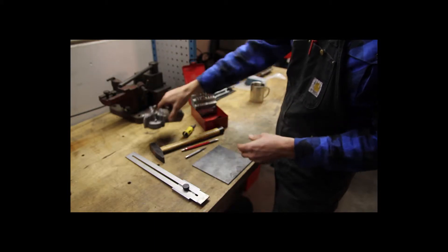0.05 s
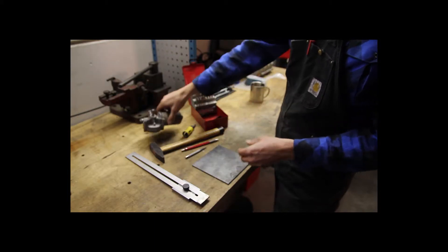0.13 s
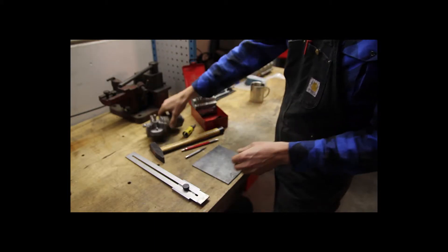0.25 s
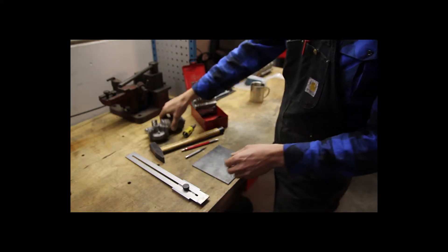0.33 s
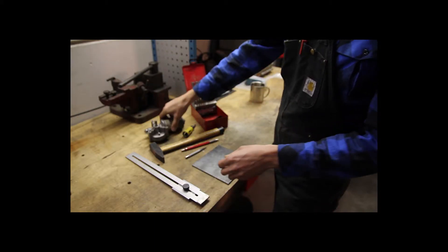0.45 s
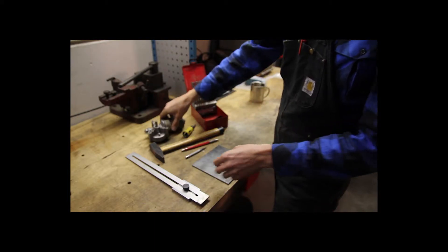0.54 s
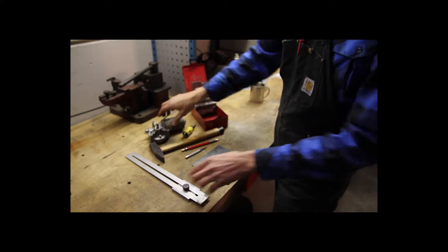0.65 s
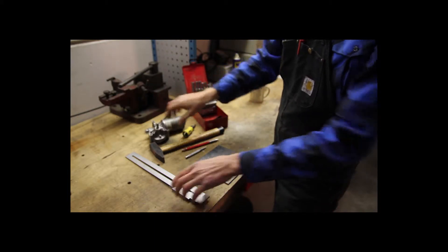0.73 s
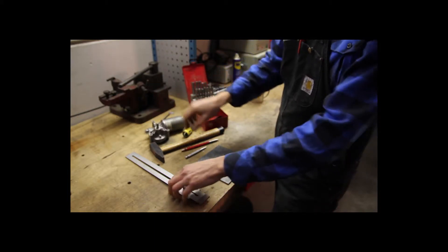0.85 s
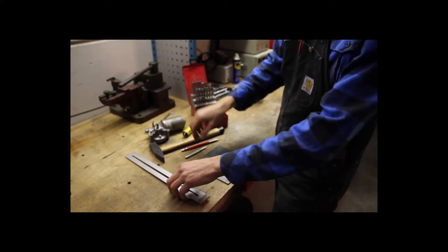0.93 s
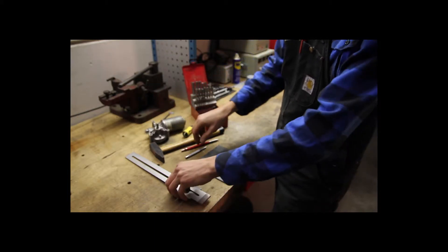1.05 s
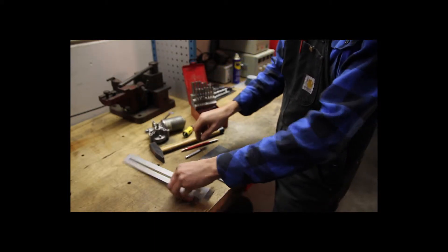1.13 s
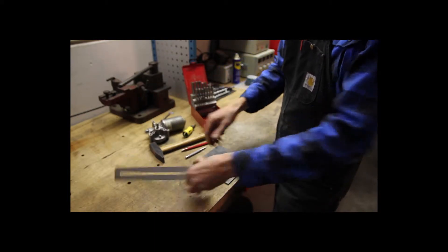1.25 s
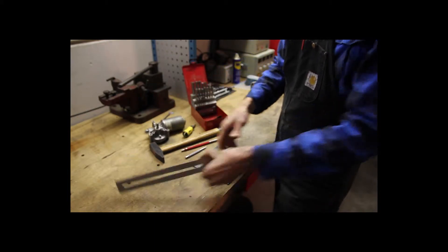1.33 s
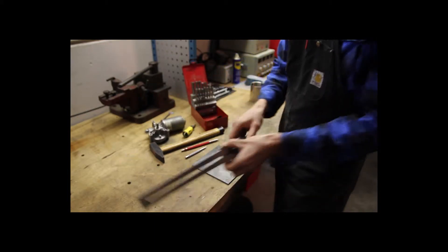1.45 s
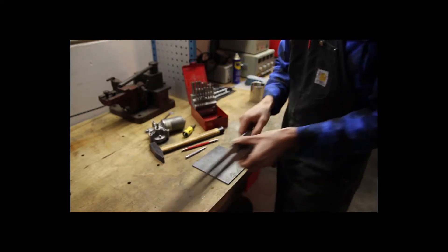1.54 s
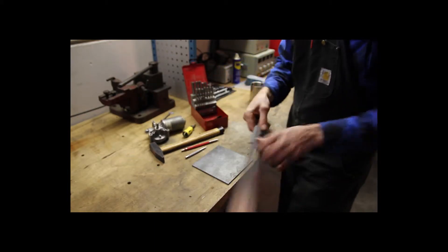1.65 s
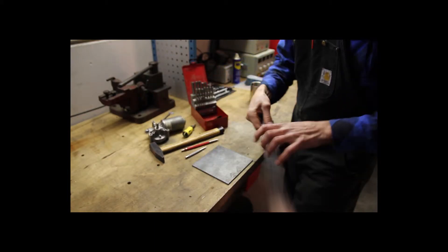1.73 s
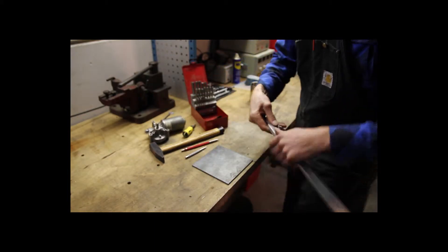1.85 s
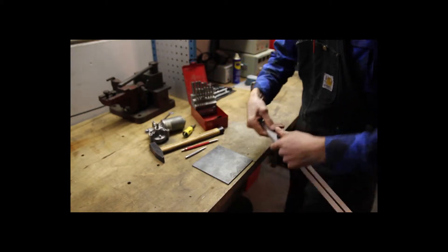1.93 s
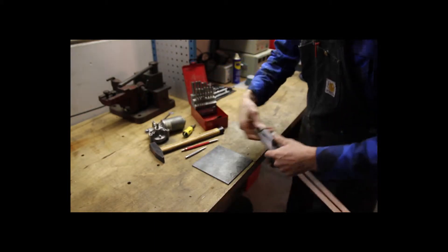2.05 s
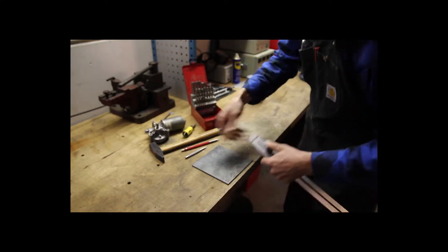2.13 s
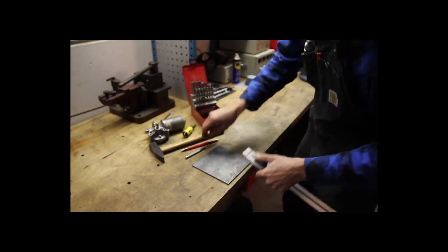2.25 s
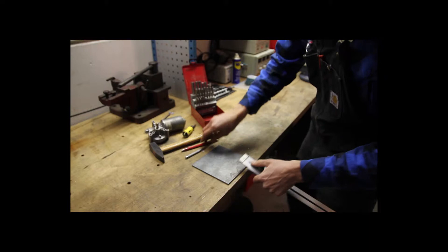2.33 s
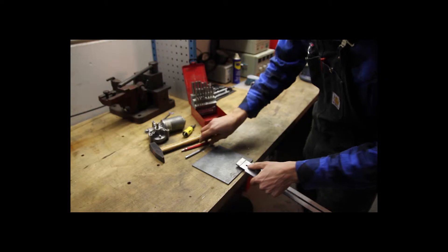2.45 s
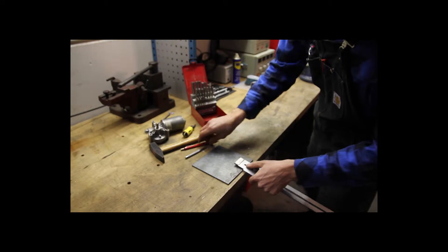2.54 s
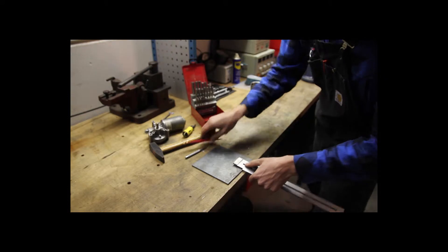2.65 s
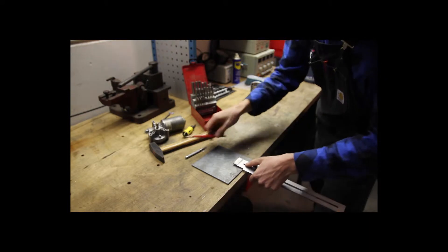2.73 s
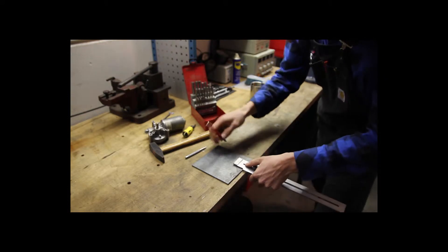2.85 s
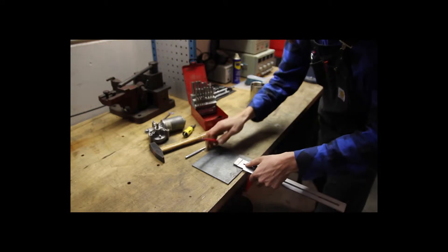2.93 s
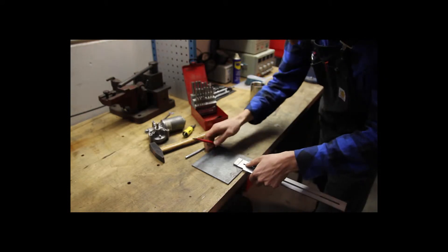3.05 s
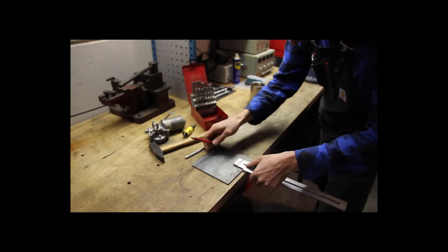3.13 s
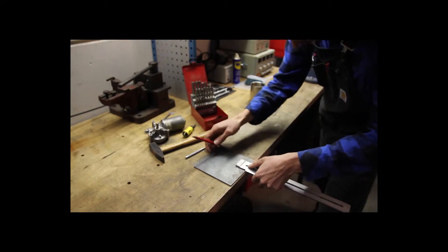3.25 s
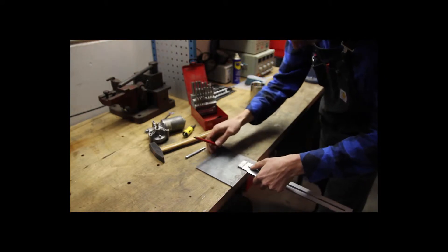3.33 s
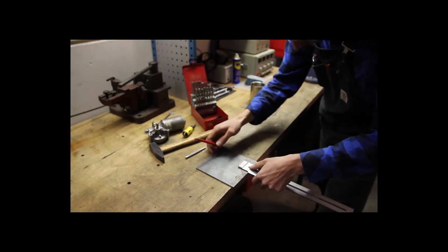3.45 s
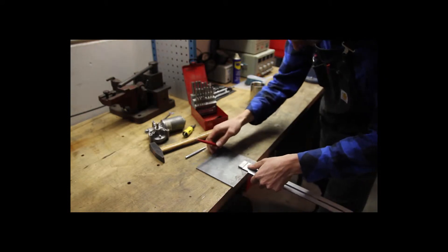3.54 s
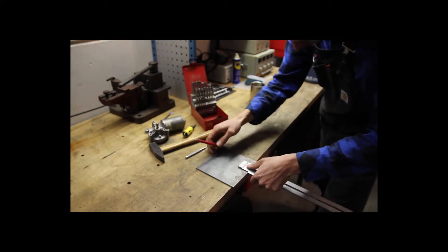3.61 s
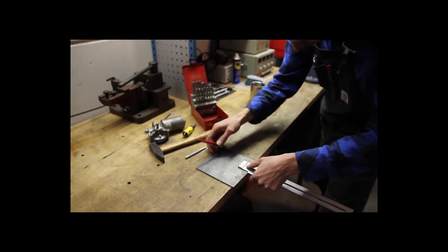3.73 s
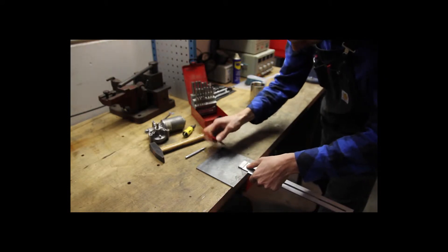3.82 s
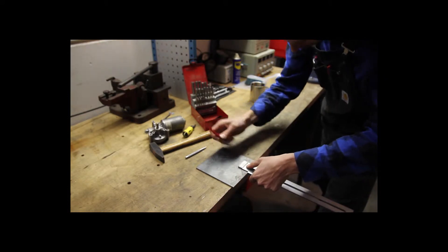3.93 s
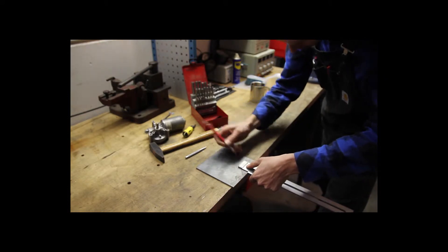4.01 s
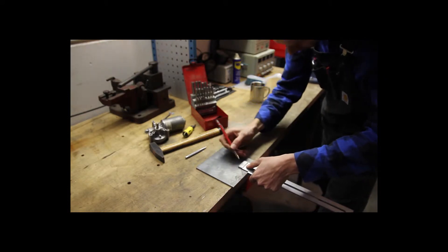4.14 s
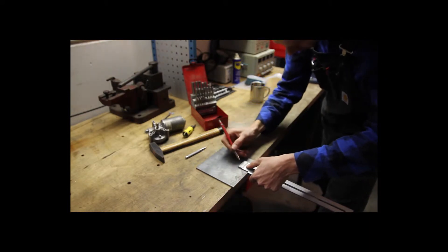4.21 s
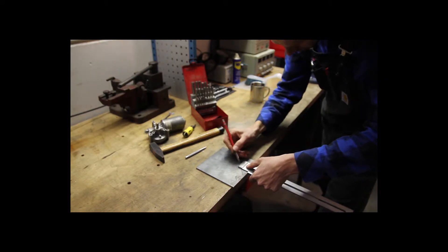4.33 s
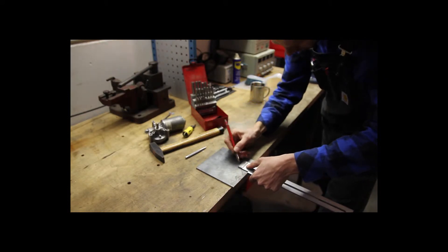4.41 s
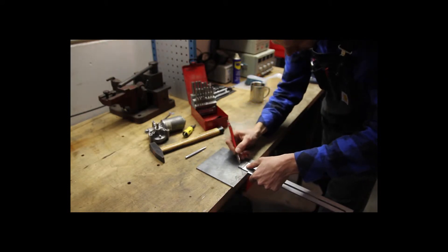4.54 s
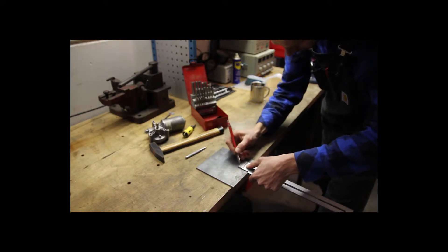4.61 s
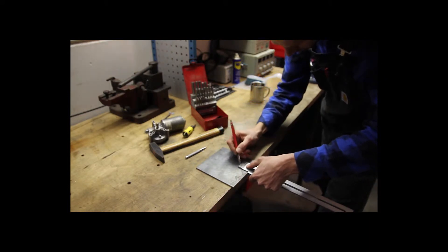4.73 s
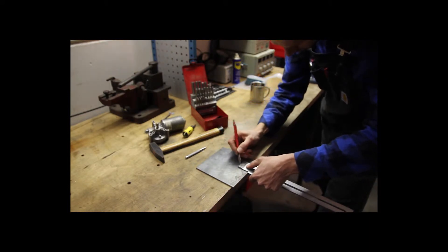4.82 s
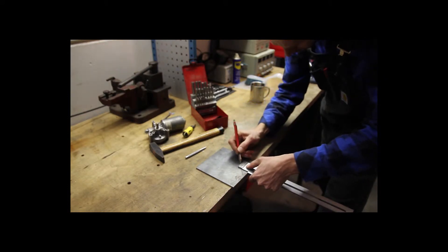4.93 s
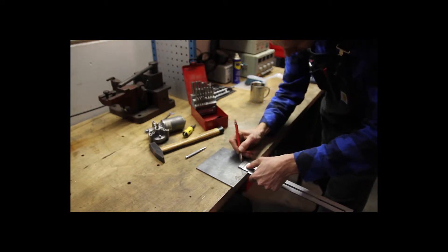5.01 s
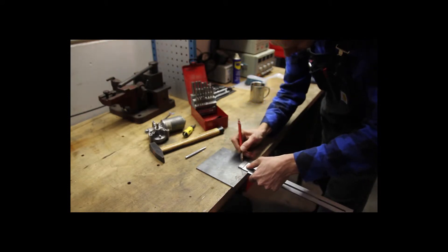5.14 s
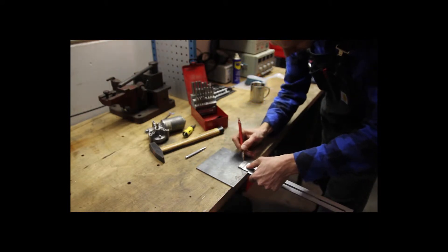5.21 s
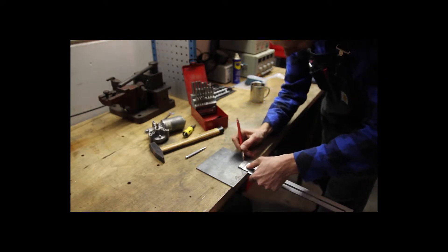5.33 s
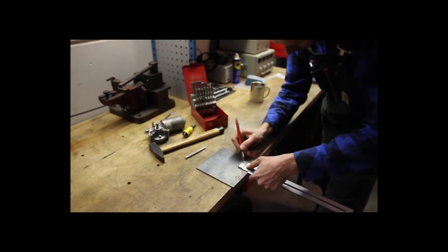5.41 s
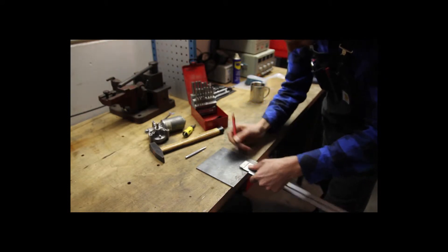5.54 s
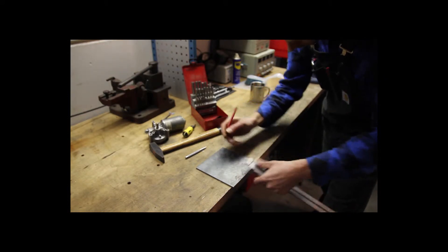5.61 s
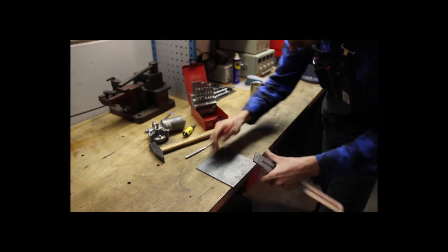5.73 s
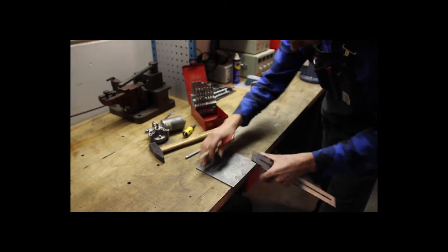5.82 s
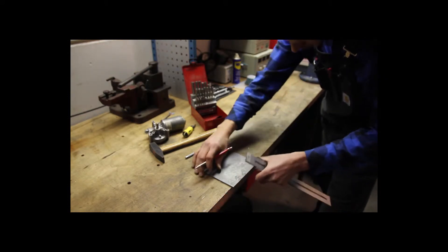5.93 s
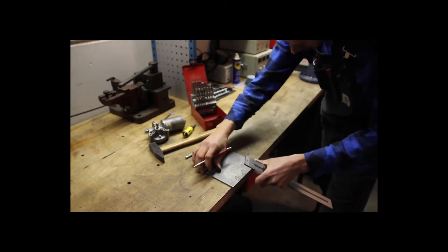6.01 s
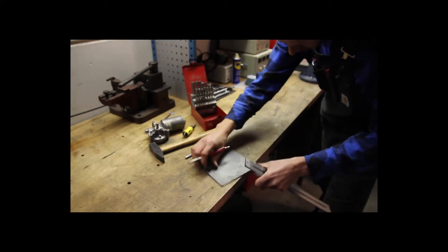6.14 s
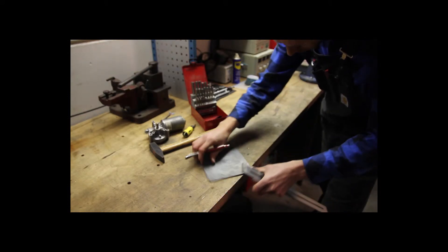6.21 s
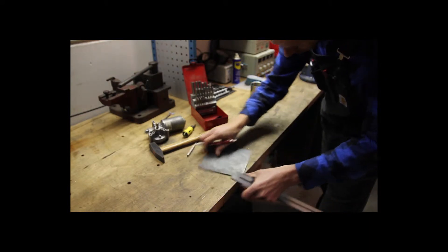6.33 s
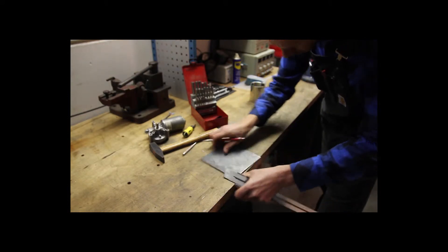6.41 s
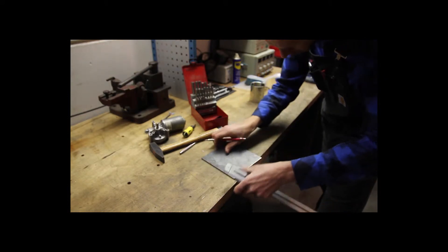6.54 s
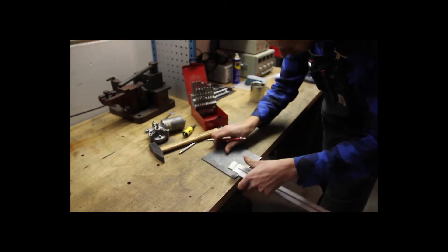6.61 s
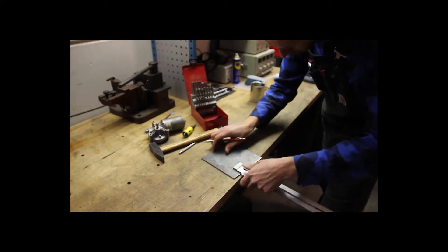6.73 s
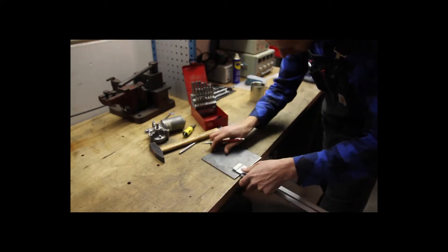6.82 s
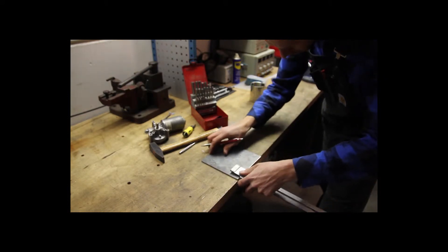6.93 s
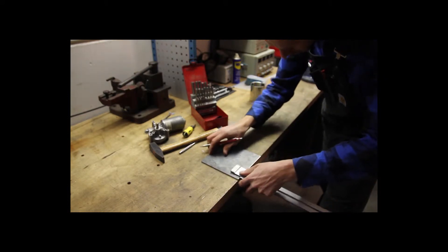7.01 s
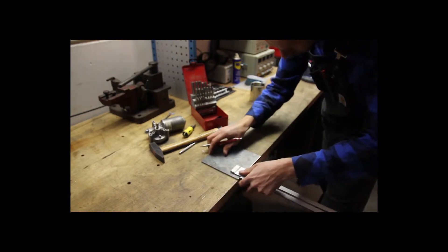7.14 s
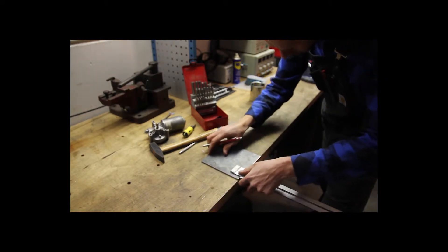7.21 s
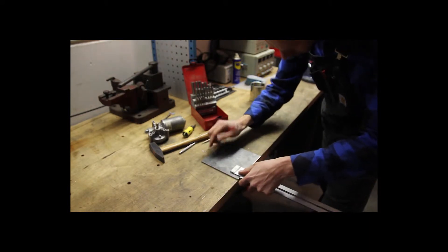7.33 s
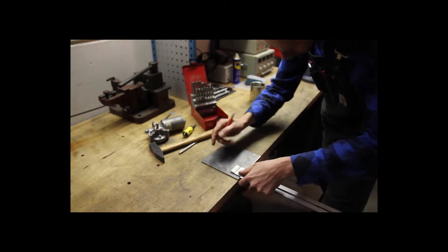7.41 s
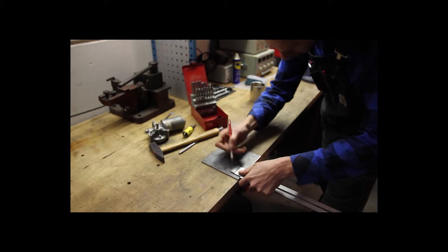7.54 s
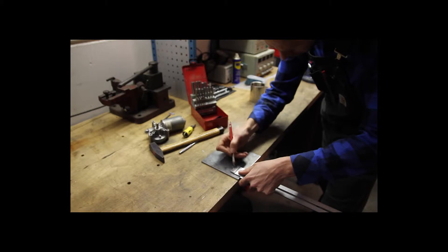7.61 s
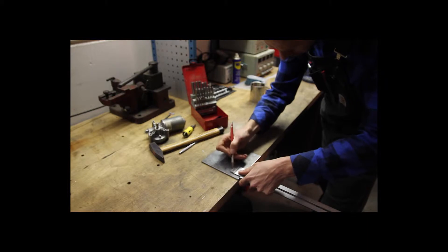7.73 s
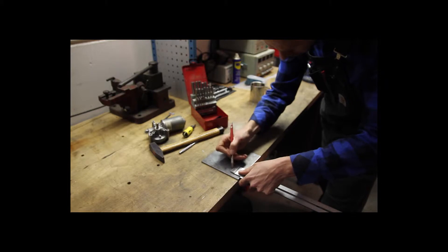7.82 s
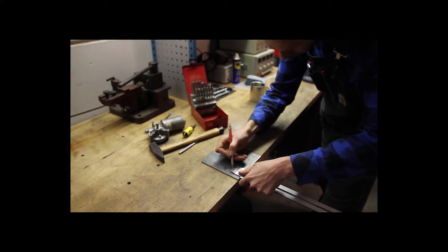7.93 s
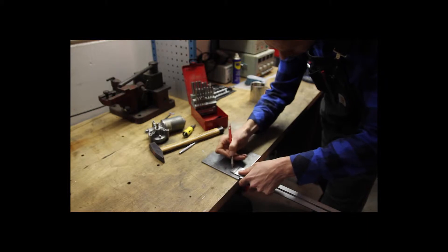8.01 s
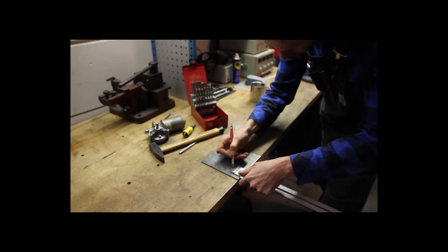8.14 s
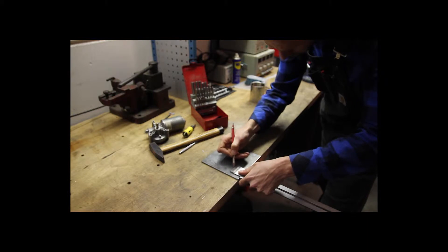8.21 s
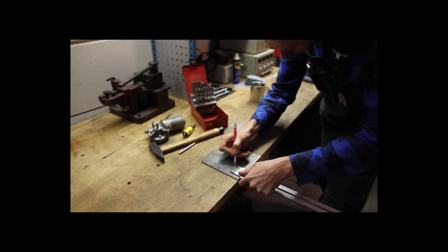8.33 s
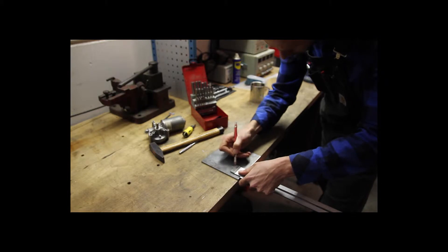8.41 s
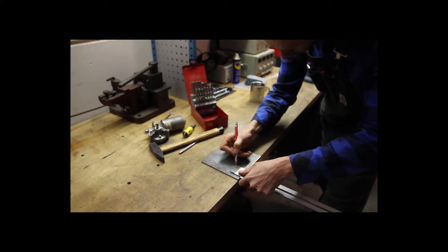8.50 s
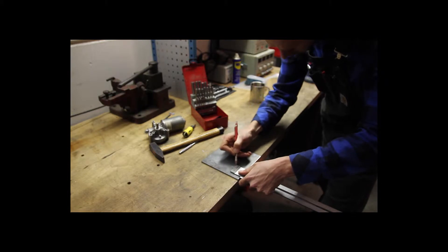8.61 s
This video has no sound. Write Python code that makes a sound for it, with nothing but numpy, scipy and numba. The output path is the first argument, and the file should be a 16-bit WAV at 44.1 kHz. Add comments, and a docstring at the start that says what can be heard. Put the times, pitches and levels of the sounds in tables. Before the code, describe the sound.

A heavy metal thud on a wooden bench, then small knocks, clinks, scrapes and light scratching on steel, with sleeves rustling.

```python
"""A steel plate is knocked about and slid on a wooden workbench. Each knock rings the wood, the steel and the
bench frame; sliding parts catch and slip, so they rasp. A gauge is dragged off the bench, a scriber (a pointed
marking tool) scratches the plate, sleeves rustle. The room hums and echoes briefly. An automatic volume control
turns the sound down after loud knocks."""
import sys
import numpy as np
from scipy import signal
from scipy.fft import rfft, irfft
from scipy.io import wavfile
from scipy.ndimage import uniform_filter1d
from numba import njit

SR = 44100
rng = np.random.default_rng(int(sys.argv[2]) if len(sys.argv) > 2 else 0)


def master(y):
    """Save y as 16-bit WAV."""
    cut = np.clip(np.atleast_2d(y).T, -1, 1)
    pcm = np.round(cut * 32767)  # scale
    wavfile.write(sys.argv[1], SR, pcm.astype(np.int16))


N = 382087
T = np.arange(N) / SR

# The tones that bench top, plate and bench frame ring at: pitch_hz, width_hz, level_db
WOOD_TONES = [(250, 40, -8), (325, 30, 0), (392, 35, 0), (461, 40, -1), (530, 35, -3), (610, 50, -6),
              (682, 35, 0), (838, 40, -3), (943, 40, -2), (1020, 35, 0), (1105, 40, 0), (1180, 50, -6),
              (1304, 40, -9), (1466, 50, -11), (1575, 45, -9), (1790, 40, -9), (1980, 50, -10)]
STEEL_TONES = [(2380, 50, -3), (2610, 90, -4), (3330, 120, -2), (4483, 20, 2), (5280, 70, -7),
               (5685, 50, -2), (6100, 40, -12), (6470, 45, -8), (6820, 60, -12), (7140, 50, -9),
               (8520, 35, -11), (9070, 55, -2), (9760, 30, -15), (10250, 35, -11), (11680, 35, -15),
               (12100, 45, -17), (12650, 40, -11), (12980, 35, -16), (13950, 40, -19), (14900, 50, -21)]
FRAME_TONES = [(80, 12, -9), (95.4, 37, 6), (138, 11, -13)]
# The bench top's many other tones, so close that they blur into noise: pitch_hz, level_db
BOARD_COLOUR = [(88, -45), (150, -23.5), (330, -0.5), (693, -7), (780, -6.5), (1080, -1.5), (1250, -13.5),
                (2500, -20), (3250, -25), (5500, -120)]


def knocks():
    """Each knock is a short, rough push that rings wood and steel, with a sharp crack and a low thump."""
    # start_s, wood_db, wood_pitch_hz, steel_db, steel_pitch_hz, brightness_db_per_octave, thump_db,
    # contact_ms (levels and contact time are base values, adjusted below)
    hits = [(0.093, -36, 253, -36.5, 3280, -11, -61, 6), (0.423, 23, 460, -6, 2400, -15, -42, 8.5),
            (0.449, 10.5, 457, -18, 2460, 2, -35, 5.7), (0.536, -3, 323, -57, 2920, 0.3, -10, 5),
            (0.691, -0.5, 1210, -16, 3020, -8, -12, 3.9), (0.713, -10.5, 353, -28, 2670, -8, -7, 2.8),
            (0.911, -13.5, 210, -42, 2770, 2, -30, 6.1), (1.025, -10.5, 1185, -29.5, 2770, -12, -34, 4.3),
            (1.432, -45, 396, -41.5, 5000, 4, -55, 3.2), (1.564, -28, 1190, -32.5, 5890, 7, -61, 3),
            (1.737, -39, 390, -36, 4100, 8, -55, 3.5), (2.199, -35, 299, -37.5, 3100, 1, -52, 8.5),
            (2.243, -33, 1030, -37, 2470, -1, -55, 9.6), (2.398, -24, 356, -39.5, 3430, 0.3, -51, 7),
            (2.552, -6.5, 563, -28.5, 2480, -11.5, -53, 12), (2.63, 13.5, 400, -20, 2400, -12, -16, 7),
            (2.677, 7.5, 830, -12.5, 7100, 5.5, -11, 6.7), (2.728, 0, 1130, -30, 2760, -3, -43, 4.6),
            (2.823, -30, 450, -34.5, 5300, 5, -60, 6), (2.956, -38, 447.5, -41, 5200, 0, -75, 4),
            (2.968, -41, 450, -39, 4600, -2, -64, 4), (3.105, -14, 694, -45, 3570, 4, -34, 19),
            (3.123, -8, 1040, -39, 2730, 3, -25.5, 11), (3.236, -16, 693, -30, 3330, 1, -43, 6.8),
            (3.384, -4, 1130, -7, 3350, 1.5, -27, 3.5), (3.503, -8, 322, -22, 2600, -3, -21, 5.1),
            (3.614, -16, 820, -49, 2730, -4, -49, 7.2), (3.708, -13, 396, -25, 5300, -4.5, -33, 5.9),
            (3.789, -12, 346, -25.5, 2750, -14.5, -30, 6.13), (4.015, -51, 293, -35.5, 3660, 4.5, -57, 4.5),
            (4.073, -22, 630, -22.5, 3272, 5.5, -34, 3.9), (4.124, -42, 291.3, -38.5, 2410, 11, -48, 3.7),
            (4.615, -19, 920, -34.5, 4420, 5, -37, 3.3), (4.627, -3.5, 910, -17, 2290, -10.5, -30, 5),
            (4.915, -25, 888, -43, 10500, 7, -47, 3.9), (4.945, -19, 937, -36, 10500, 5, -41, 3.5),
            (4.962, -23, 514, -32, 10500, 5, -41, 3), (4.979, -7.5, 320, -23, 10600, -5, -37, 4.4),
            (5.004, -9, 1140, -22, 11800, -7, -28, 4), (5.033, -13, 288, -29, 9500, -5, -21, 6.8),
            (5.064, -22, 907, -24, 11200, -8, -27, 7.8), (5.099, -5.5, 960, -17.5, 3300, -0.5, -23, 3.9),
            (5.121, -8, 1180, -23, 3280, -1, -22, 2.7), (5.218, 0, 1040, 1.5, 2350, 8, -44, 4.7),
            (5.249, -15, 888, -17, 2390, -2, -26, 3.3), (5.322, -25, 900, -33, 5600, 7, -41, 4),
            (5.538, -35, 485, -39, 5700, 2, -29, 4), (5.597, -19, 285, -42, 3360, 8, -33, 3.5),
            (5.613, -16, 1120, -32, 3360, 6.5, -32, 11), (5.874, -38, 404, -30.5, 2820, 7.5, -41, 6.5),
            (5.921, -23.5, 437, -42, 3640, 0, -49, 2.5), (6.144, -10, 400, -21.5, 6500, 5, -36, 7),
            (6.34, 2.5, 1020, -5, 3400, 6, -18, 3.6), (6.419, 1, 680, -18, 6100, 1, -41, 6.7),
            (6.46, -1, 1010, -13.5, 9000, 0, -42, 5), (6.807, -31, 398, -39.5, 7200, 7, -41, 3.6),
            (6.846, 0, 940, -12, 4000, 5, -24, 5.8), (6.973, -19, 773, -31, 2780, 6, -34, 7.4),
            (7.008, -14, 394, -17, 5500, 9.5, -28, 5.3), (7.057, 5.5, 815, -14, 4630, 3, -17.5, 2.7),
            (7.099, -5.5, 1100, -46, 2750, 0.3, -29, 4), (7.295, -7, 426, -35, 2750, -1, -19, 9.61),
            (7.474, -7.5, 540, -31.5, 2830, 2, -22.5, 3.9), (7.749, -7.5, 940, -29.5, 7400, 3, -29.5, 11),
            (7.793, -14, 1010, -29.5, 5100, 3.5, -42, 10.7), (7.972, -16, 624, -37, 8900, 4, -43, 5.03),
            (7.996, -9, 1050, -39, 2320, 9, -39, 12.3), (8.191, -17, 1010, -36, 3650, 16, -39, 2.06),
            (8.213, -10.5, 990, -24.5, 2430, 11.5, -24, 6), (8.382, 2.5, 1940, -4, 2790, 9, -27, 4),
            (8.524, -14.5, 1000, -35.5, 3320, 4, -28.5, 7.5)]
    # The crack of hard contact: pitch_hz, level_db
    crack_colour = [(880, -49), (1500, 2.5), (3350, 3), (4970, -8), (5830, 1), (7240, -15), (8920, -12),
                    (9950, -16), (16000, -22)]
    out, t = np.zeros(N + SR), np.arange(int(.4 * SR)) / SR
    hz = np.fft.rfftfreq(len(t), 1 / SR) + 1
    wood_rings, steel_rings = free_rings(WOOD_TONES, t, stretch=7.6), free_rings(STEEL_TONES, t, stretch=1)
    thump = free_rings(FRAME_TONES, t, stretch=1.4).sum(axis=0) * np.clip(t / 0.0042, 0, 1)
    steel_fade = die_away(t, fade_s=0.032)  # the plate soon stops ringing
    for start_s, wood_db, wood_hz, steel_db, steel_hz, brightness, thump_db, contact_ms in hits:
        push_noise, crack_noise, board_noise = rng.standard_normal((3, len(t)))
        # where the blow lands makes some tones stronger than others
        wood_mix = favour(np.array(WOOD_TONES)[:, 0], wood_hz, octaves=0.11)
        wood_mix *= from_db(2.5 * rng.standard_normal(len(WOOD_TONES)))
        steel_mix = favour(np.array(STEEL_TONES)[:, 0], steel_hz, octaves=0.27)
        steel_mix *= from_db(2.5 * rng.standard_normal(len(STEEL_TONES)))
        progress = t / (max(contact_ms, 1) * 0.0011)
        force = progress * np.exp(-3 * progress) + 2.7 * np.exp(-progress)
        push = (push_noise * force)[:SR // 20]
        wood_fade = die_away(t, fade_s=0.093 * 2 ** (0.0329 * wood_db))  # louder knocks ring longer
        wood = signal.fftconvolve(push, wood_fade * (wood_mix @ wood_rings))[:len(t)]
        steel = signal.fftconvolve(push, steel_fade * (steel_mix @ steel_rings))[:len(t)]
        board = irfft(rfft(board_noise) * favour(hz, wood_hz, octaves=1.52), len(t))
        board = colour(board, BOARD_COLOUR) * wood_fade * np.clip(progress, 0, 1)
        tilt = from_db(brightness * np.log2(hz / 3000))
        crack = irfft(rfft(crack_noise) * favour(hz, steel_hz, octaves=2.2) * tilt, len(t))
        crack = colour(crack, crack_colour) * force
        knock = set_peak(wood, wood_db - 9.5) + set_peak(board, wood_db - 3.5)
        knock += set_peak(steel, steel_db + 4) + set_peak(crack, steel_db + 11)
        i = int(start_s * SR)
        out[i:i + len(t)] += knock + set_peak(thump, thump_db + 0.5)
    return out[:N]


def sliding_plate():
    """The plate catches and slips on grit, shaking the wood, the steel and the bench frame."""
    # start_s, middle_s, stop_s, wood_start_db, wood_middle_db, wood_stop_db, steel_over_wood_db, frame_db
    slides = [(2.446, 2.577, 2.62, -40, -29, -14, -22, -33.5),
              (2.668, 2.795, 3.09, -23.5, -25.5, -62, -13.5, -51),
              (3.23, 3.359, 3.512, -21, -9.5, -23, -12, -31),
              (3.526, 3.565, 3.83, -31, -36.5, -41, -21, -39),
              (4.962, 4.992, 5.135, -25, -26.5, -14.5, -20, -31.5),
              (5.586, 5.625, 5.66, -39.5, -23, -57, -5.5, -35.5),
              (6.128, 6.2, 6.52, -16, -6, -9.5, -14.5, -31.5),
              (6.384, 6.487, 6.62, -34, -8, -20.5, -8.5, -45),
              (6.903, 6.98, 7.03, -29.5, -24, -17, -7.5, -40), (7.07, 7.11, 7.4, -33, -30.5, -43, -42, -40),
              (8.203, 8.247, 8.46, -25, -28.5, -30, -16.5, -37.5)]
    # A hand leans on the bench and the frame groans: start_s, stop_s, start_db, stop_db
    leans = [(0.809, 0.98, -43, -34.5), (3.044, 3.08, -38, -38), (3.825, 3.9, -38, -46),
             (5.55, 5.575, -42, -46), (6.004, 6.107, -41, -46)]
    # Grit scraping on steel: pitch_hz, level_db
    grit_colour = [(880, -31), (1500, -13), (2230, -3), (3380, 7.5), (4040, -15), (5490, 8), (7690, -66),
                   (8830, -58), (12000, -45), (16000, -30)]
    judder = from_db(1.2 * wobble(70))
    slip, grit = grains(2.5), grains(1.8)
    wood = resonate(slip, WOOD_TONES, wobble_db=4, rate_hz=17) + from_db(0.5) * colour(slip, BOARD_COLOUR)
    steel = resonate(grit, STEEL_TONES, wobble_db=3.5, rate_hz=10) + from_db(-5) * colour(grit, grit_colour)
    frame = resonate(rng.standard_normal(N), FRAME_TONES, wobble_db=0.93, rate_hz=2.7)
    times, wood_db, steel_db, frame_db = np.hsplit(np.array(slides), [3, 6, 7])
    gain = lambda db: strokes(times, db, rise_s=0.014, fall_s=0.01)
    scrape = normalise(wood) * gain(wood_db) + normalise(steel) * gain(wood_db + steel_db)
    lean_gain = strokes(*np.hsplit(np.array(leans), 2), rise_s=0.011, fall_s=0.015)
    return judder * scrape + frame * (gain(np.repeat(frame_db, 3, axis=1)) + lean_gain)


def gauge():
    """The steel gauge rasps over the wood and rings as it is dragged off the bench."""
    # start_s, stop_s, start_db, stop_db
    drags = [(1.193, 1.303, -31, -19)]
    # The gauge's ring: pitch_hz, width_hz, level_db
    gauge_tones = [(490, 26, 2), (1057, 60, -8.5), (1920, 100, -18), (2330, 74, -20), (2740, 53, -20),
                   (3150, 100, -21), (4170, 36, -26), (4630, 50, -22), (5570, 38, -26), (9300, 79, -35),
                   (10500, 80, -30), (12600, 90, -31)]
    # Steel rubbing on wood: pitch_hz, level_db
    rasp_colour = [(120, -54), (200, -19), (424, -11), (482, -10), (623, -18), (1040, -5), (1210, -14),
                   (8000, -46), (12000, -36), (16000, -46)]
    rub = grains(1.7)
    ring = resonate(rub, gauge_tones, wobble_db=2.5, rate_hz=40)
    gain = strokes(*np.hsplit(np.array(drags), 2), rise_s=0.022, fall_s=0.02)
    return normalise(ring + from_db(-3.5) * colour(rub, rasp_colour)) * gain


def scriber():
    """Pressed down, the point makes the plate's body sound; barely grazing it, it only hisses."""
    # start_s, stop_s, body_start_db, body_stop_db, graze_over_body_db, hum_over_body_db
    scratches = [(2.575, 2.637, -49, -41, 6, -20), (5.252, 5.557, -24.5, -44.5, -14.5, -16),
                 (8.131, 8.175, -59, -55.5, 15, -20), (8.193, 8.364, -35, -26.5, -17, 0),
                 (8.41, 8.634, -34, -32, -19, -9)]
    # The plate's body under the point: pitch_hz, level_db
    body_colour = [(120, -45), (200, -17), (424, -3.5), (558, -22), (635, 1), (683, -20), (950, -3),
                   (1015, 2), (1090, -3.5), (1710, -10), (2420, -8.5), (4200, -30), (5520, -25),
                   (9230, -48), (16000, -48)]
    # The hum of the pressed plate: pitch_hz, width_hz, level_db
    hum_tones = [(1018, 31, 0)]
    scratch = grains(1.6) * from_db(wobble(40))
    body = colour(scratch, body_colour)
    graze = colour(scratch, [(2000, -25), (3500, 8), (6500, 2), (9500, -18), (16000, -21)])
    hum = resonate(scratch, hum_tones, wobble_db=2, rate_hz=30)
    times, body_db, graze_db, hum_db = np.hsplit(np.array(scratches), [2, 4, 5])
    gain = lambda db: strokes(times, db, rise_s=0.0042, fall_s=0.007)
    return body * gain(body_db) + hum * gain(body_db + hum_db) + graze * gain(body_db + graze_db)


def sleeves():
    """Moving cloth rubs and creases: a soft rustle with a quick flicker."""
    # Arm movements: start_s, stop_s, start_db, stop_db
    moves = [(0.0, 0.4, -49, -46), (0.867, 1.16, -53, -46), (1.38, 1.884, -49, -45),
             (1.917, 2.376, -40.5, -48.5), (4.01, 4.16, -63, -64)]
    # Sudden creases: peak_s, level_db
    creases = [(0.0, -42), (0.094, -51), (0.17, -43), (1.026, -31.5), (1.63, -32.5), (1.734, -40),
               (1.93, -37), (2.066, -38.5), (2.2, -41.5), (2.406, -49), (4.074, -37.5)]
    # Rubbing cloth: pitch_hz, level_db
    cloth_colour = [(88, -47), (150, -8), (275, 4), (368, -3.5), (398, -3), (475, -20), (545, -3),
                    (837, -2.5), (3490, -7.5), (16000, -32.5)]
    gain = strokes(*np.hsplit(np.array(moves), 2), rise_s=0.0072, fall_s=0.011)
    gain += swells(creases, db_per_s=433)
    return colour(grains(2.2), cloth_colour) * from_db(2 * wobble(30.4)) * gain


def room_echo(x, level_db=-12.5):
    """The room answers with a short wash of sound whose high pitches die first."""
    # How long the echo takes to drop 60 dB: pitch_hz, fade_s
    echo_times = [(100, 0.71), (500, 0.44), (2000, 0.43), (6000, 0.27), (14000, 0.25)]
    pitches, fades = np.transpose(echo_times)
    t, hz = np.arange(SR) / SR, np.fft.rfftfreq(SR, 1 / SR)
    noise, tail = rfft(rng.standard_normal(SR)), 0
    for centre_hz in 60 * 2. ** np.arange(9):
        fade_s = np.interp(np.log(centre_hz), np.log(pitches), fades)
        band = np.clip(1 - np.abs(np.log2((hz + 1) / centre_hz)), 0, 1)
        tail += irfft(noise * band, SR) * die_away(t, fade_s)
    tail *= np.clip(t / 0.0047, 0, 1)
    return signal.fftconvolve(x, tail * from_db(level_db) / np.sqrt(np.sum(tail ** 2)))[:N]


def workshop_air():
    """The workshop hums under a faint hiss, and a deep rumble comes and goes."""
    # Hum and hiss: pitch_hz, level_db
    hum_colour = [(26, -51), (45, 5), (74, -3.5), (112, -1.5), (150, -13), (197, -3.5), (314, -9),
                  (401, -3.5), (476, -6), (2030, -17), (2600, -17), (4350, -20), (16000, -30.5)]
    # Their slow drift: time_s, level_db
    hum_levels = [(0.0, -43.5), (1.0, -41), (3.6, -40), (4.3, -44.5), (5.0, -41.5), (6.0, -41.5),
                  (7.4, -45), (7.9, -44), (8.66, -39)]
    # Swells of the rumble: peak_s, level_db
    rumble_peaks = [(0.08, -41), (0.9, -29), (1.7, -37.5), (2.39, -34), (3.91, -34), (4.66, -37.5),
                    (5.12, -43), (6.0, -33.5), (6.63, -37), (7.72, -34), (8.66, -33.5)]
    rumble = colour(rng.standard_normal(N), [(6, 2.5), (14, 6), (25, -11), (42, -47)])
    hum = colour(rng.standard_normal(N), hum_colour) * from_db(np.interp(T, *np.transpose(hum_levels)))
    return hum + rumble * swells(rumble_peaks, db_per_s=39.5)


def amplifier_hiss(level_db=-59):
    """The amplifier adds a faint, steady hiss."""
    hiss_colour = [(100, -1), (500, -3), (2000, -14.5), (5000, -3.5), (16000, 1.5)]
    return colour(rng.standard_normal(N), hiss_colour) * from_db(level_db)


def from_db(db):
    return 10 ** (np.asarray(db) / 20)


def normalise(x):
    return x / np.sqrt(np.mean(x ** 2))


def set_peak(x, db):
    return x * from_db(db) / np.max(np.abs(x))


def die_away(t, fade_s):
    """A fade that drops 60 dB in fade_s."""
    return np.exp(-np.log(1000) * t / fade_s)


def favour(hz, centre_hz, octaves):
    """Weights that are largest near one pitch."""
    return 0.067 + np.exp(-(np.log2(hz / centre_hz) / octaves) ** 2)


def colour(x, points):
    """Shape lows and highs by (pitch_hz, level_db) points; the result has strength 1."""
    pitches, db = np.transpose(points)
    hz = np.fft.rfftfreq(len(x), 1 / SR)
    gain = from_db(np.interp(np.log(hz + 1), np.log(pitches), db, -90, -90))
    return normalise(irfft(rfft(x) * gain, len(x)))


def wobble(rate_hz):
    """Glide from one random value to the next, about 1 in size."""
    step = int(SR / rate_hz)
    return 1.2 * uniform_filter1d(np.repeat(rng.standard_normal(N // step + 1), step), step)[:N]


def grains(scatter_db):
    """Rubbing noise: many tiny grains, a few much louder than the rest."""
    size = np.minimum(rng.exponential(size=N // 16 + 1), 5)
    return normalise(rng.standard_normal(N) * from_db(scatter_db * np.repeat(size, 16)[:N]))


def resonate(x, tones, wobble_db, rate_hz):
    """Rubbing rings every tone; the moving contact point favours now one, now another."""
    out = 0
    for hz, width, db in tones:
        r = np.exp(-np.pi * width / SR)
        feedback = [1, -2 * r * np.cos(2 * np.pi * hz / SR), r * r]
        drive = x * from_db(wobble_db * wobble(rate_hz))
        out += from_db(db) * signal.lfilter([1 - r, 0, r - 1], feedback, drive)
    return normalise(out)


def free_rings(tones, t, stretch):
    """One fading sine wave per tone; stretch makes it last longer."""
    hz, width, db = np.transpose(tones)[:, :, None]
    return from_db(db) * np.sqrt(width) * np.exp(-np.pi * width * t / stretch) * np.sin(2 * np.pi * hz * t)


def strokes(times, levels_db, rise_s, fall_s):
    """Volume of movements, one per row: each fades in, follows its levels and fades out."""
    out = np.zeros(N)
    for s, db in zip(times, levels_db):
        a, b = max(int((s[0] - rise_s) * SR), 0), int((s[-1] + 5 * fall_s) * SR)
        t = T[a:b]
        fade = np.clip((t - s[0]) / rise_s + 1, 0, 1) * np.exp(-np.maximum(t - s[-1], 0) / fall_s)
        out[a:b] += fade * from_db(np.interp(t, s, db))
    return out


def swells(peaks, db_per_s):
    """Volume that rises to each peak and falls just as fast."""
    return sum(from_db(db - db_per_s * np.abs(T - s)) for s, db in peaks)


def scene():
    """Bench and room sit in the middle; hiss is added on the left and subtracted on the right."""
    bench = knocks() + sliding_plate() + gauge() + scriber() + sleeves()
    # small things give off no deep bass
    bench = signal.sosfilt(signal.butter(3, 55, "high", fs=SR, output="sos"), bench)
    middle = bench + room_echo(bench) + workshop_air()
    hiss = amplifier_hiss()
    return np.array([middle + hiss, middle - hiss])


@njit
def follow_level(x, rise_s, fall_s):
    """Track the level, rising and falling at separate speeds."""
    level, out = 0., np.empty(len(x))
    for i in range(len(x)):
        level += (x[i] - level) / (SR * (rise_s if x[i] > level else fall_s))
        out[i] = level
    return out


def record(dry):
    """Automatic volume control turns loud moments down; peaks are flattened and the top treble is cut."""
    threshold_db, top_hz = -15.5, 15750
    level = follow_level(np.abs(dry).max(axis=0), rise_s=0.0041, fall_s=0.09)
    gain = np.minimum(1, from_db(threshold_db) / (level + 1e-9)) ** 0.55
    treble_cut = signal.ellip(10, .2, 70, top_hz, fs=SR, output="sos")
    return signal.sosfilt(treble_cut, np.clip(dry * gain, -1, 1))


dry = scene()
out = record(dry)
master(out)
```